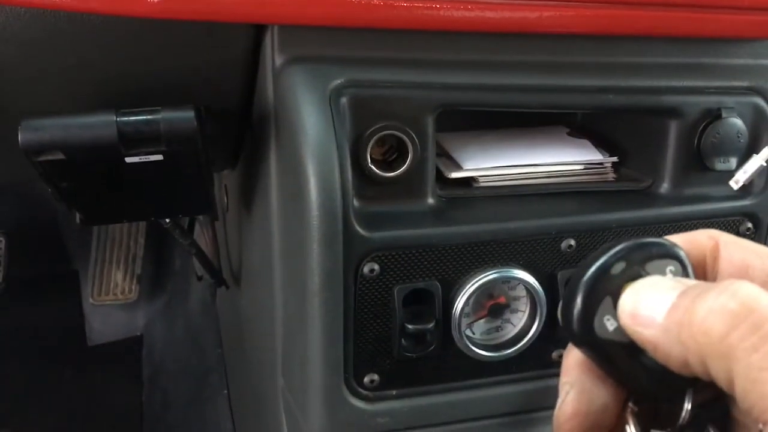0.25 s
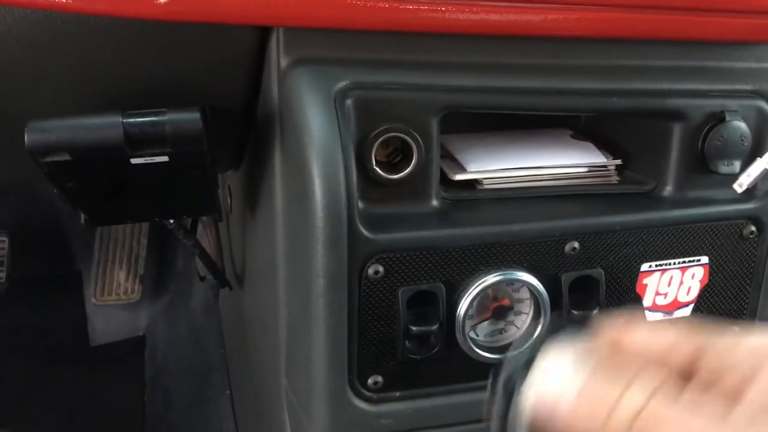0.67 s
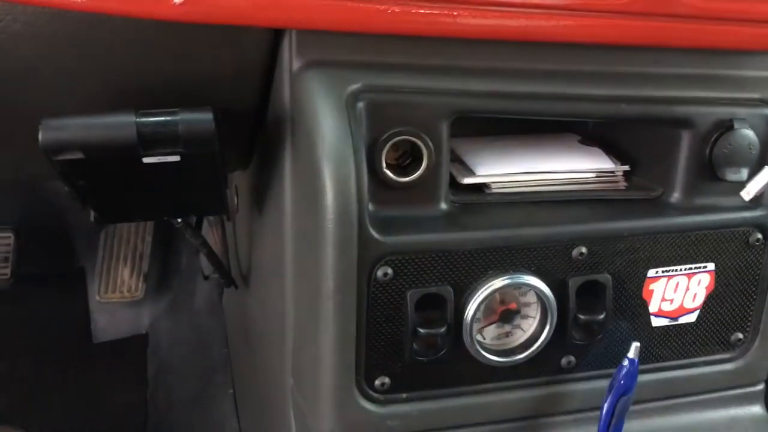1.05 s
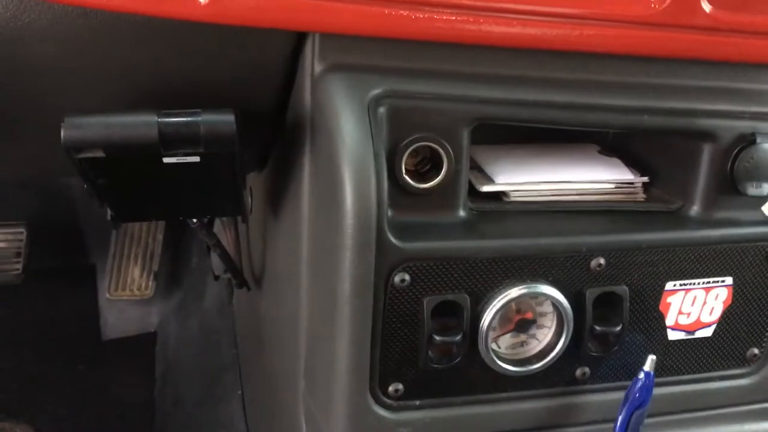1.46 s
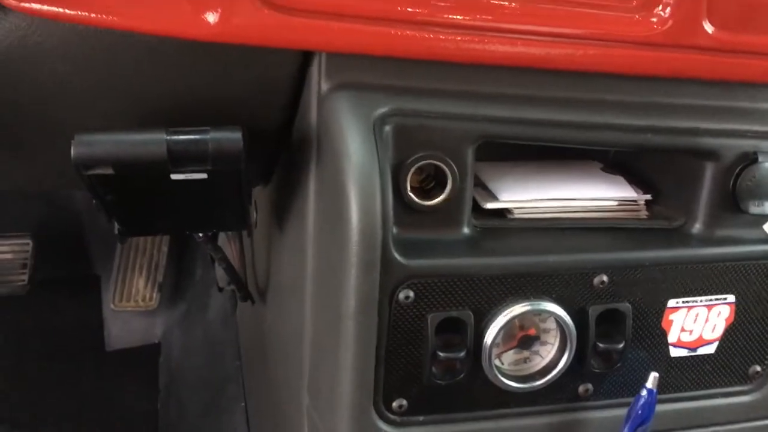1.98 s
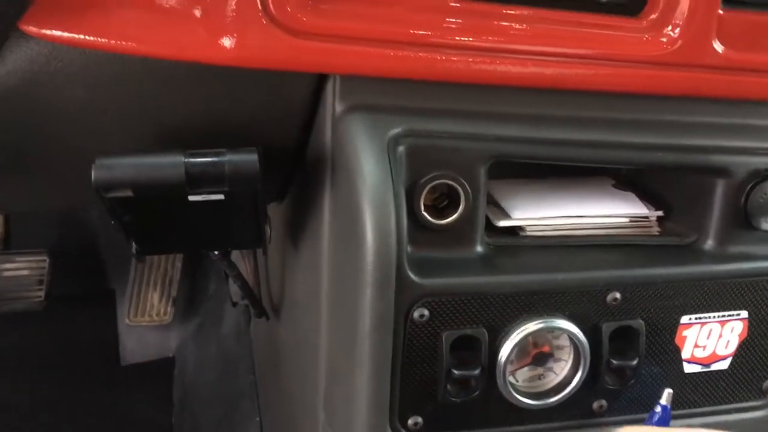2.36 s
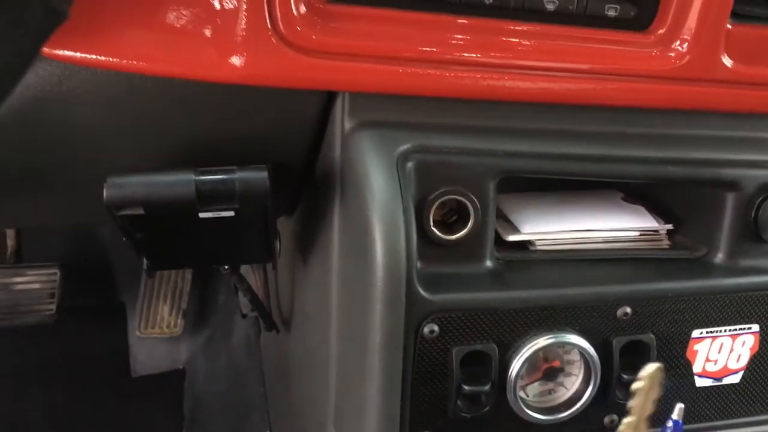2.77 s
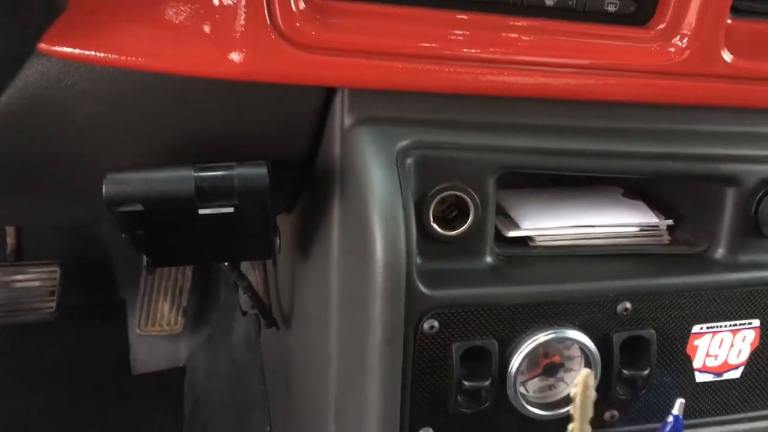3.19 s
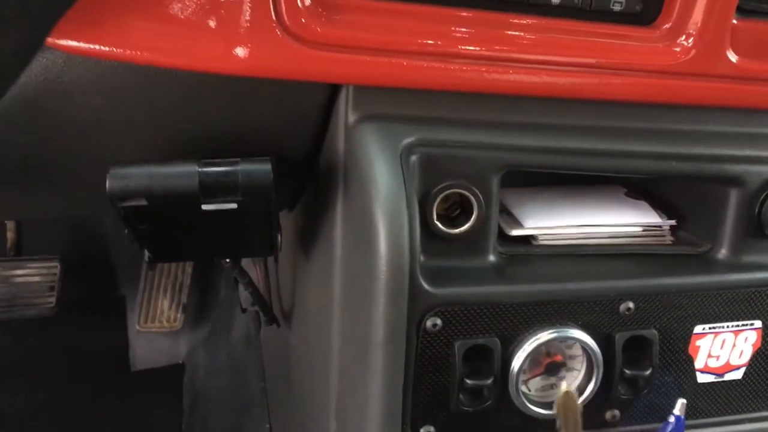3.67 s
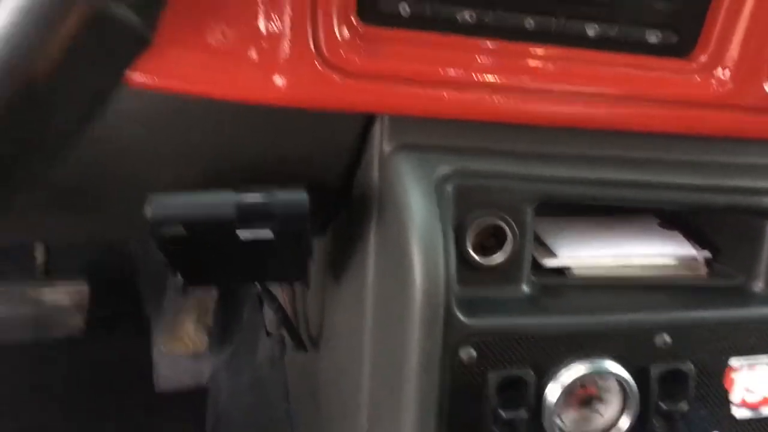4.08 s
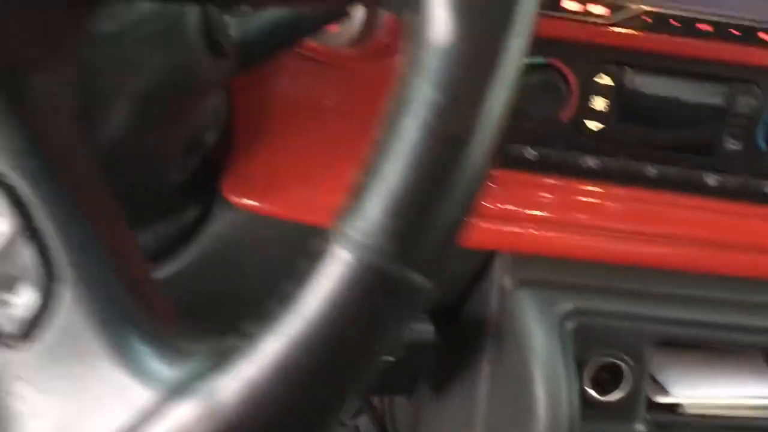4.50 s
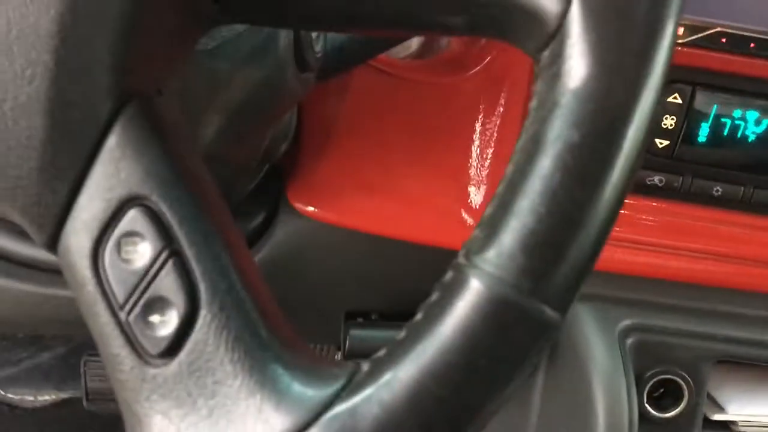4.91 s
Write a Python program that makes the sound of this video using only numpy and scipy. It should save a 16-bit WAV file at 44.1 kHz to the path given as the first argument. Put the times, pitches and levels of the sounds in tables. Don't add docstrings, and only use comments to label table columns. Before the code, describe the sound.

Keys and a plastic fob click and jingle in a quiet cab, a fuel pump hums, then a starter grinds and a diesel catches into a loud idle.

```python
import sys
import numpy as np
from scipy import signal
from scipy.fft import rfft, irfft, next_fast_len
from scipy.io import wavfile
from scipy.ndimage import uniform_filter1d

SR = 44100
rng = np.random.default_rng(int(sys.argv[2]) if len(sys.argv) > 2 else 0)


def log_audio(samples):
    frames = np.atleast_2d(samples).T
    limited = np.clip(frames, -1, 1)
    pcm = np.round(limited * 32767).astype(np.int16)
    wavfile.write(sys.argv[1], SR, pcm)


def volts_from_db(level):
    exponent = np.asarray(level, float) / 20
    return 10 ** exponent


N = 227011
T = np.arange(N) / SR
PUMP_ON_S = 2.15


def unit(x):
    return x / np.sqrt(np.mean(x ** 2) + 1e-20)


def curves(rows):
    s, *cols = np.transpose(rows)
    return [np.interp(T, s, c) for c in cols]


def between(start, end, fade):
    return np.clip(np.minimum(T - start, end - T) / fade, 0, 1)


def wobble(rate):
    knots = rng.standard_normal(int(N * rate / SR) + 4)
    return np.interp(T * rate, np.arange(len(knots)), knots)


def filtered(x, response):
    m = next_fast_len(len(x) + min(len(x), 8192))
    return irfft(rfft(x, m) * response(np.fft.rfftfreq(m, 1 / SR)), m)[:len(x)]


def noise(spectrum):
    f, db = np.transpose(spectrum)
    colour = lambda hz: volts_from_db(np.interp(np.log(hz + 1), np.log(f), db, -120, -120))
    return unit(filtered(rng.standard_normal(N), colour))


def resonances(modes):
    def response(f):
        return sum((-1) ** k * volts_from_db(db) * 1j * f * w / (c * c - f * f + 1j * f * w)
                   for k, (c, w, db) in enumerate(modes))
    return response


def add(track, s, sound):
    spot = track[round(s * SR):][:len(sound)]
    spot += sound[:len(spot)]


# order in eighths of the firing rate, level in dB.
ORDERS = [(9, -29), (10, -12), (20, -11), (34, -17), (35, -33), (44, -38)]
SPECIAL_ORDERS = {13: -19, 14: -20, 15: -20, 16: -8, 17: -18, 26: -5, 32: -12}


def firing_boom(turn):
    eighths = np.arange(9, 45)
    odd_and_high = (eighths % 2) * (eighths > 20) * (eighths < 35)
    plain_db = np.interp(eighths, *np.transpose(ORDERS)) - 5.5 * odd_and_high
    start = 2 * np.pi * rng.random(len(eighths)) * (eighths % 8 > 0)
    boom = np.zeros(N)
    for k, db, phase in zip(eighths, plain_db, start):
        order = volts_from_db(SPECIAL_ORDERS.get(k, db) + 2.5 * wobble(4)) * np.cos(k * turn / 8 + phase + .3 * wobble(5))
        if k == 26:
            order = order * (.5 + .5 * between(3.85, 5.22, 0.47))
        boom += order
    cycle = (turn - turn[round(4.33 * SR)]) / 8
    swing_level = volts_from_db(1 + 3.5 * np.cos(cycle) + 1.5 * wobble(9))
    boom = boom + swing_level * np.cos(15 * cycle + 2.3 * np.sin(cycle) + .4 * wobble(7))
    cab_top_hz = 199.5
    return unit(boom), lambda f: np.clip((cab_top_hz + 25 - f) / 40, .15, 1)


# time in seconds, firing rate in Hz, load in dB.
ENGINE_RUN = [
    (3.56, 56, -9),
    (3.6, 58.1, 0),
    (3.66, 51.76, 7.5),
    (3.73, 62.1, 7),
    (3.78, 59.1, -0.5),
    (3.85, 44.9, -7),
    (3.9, 43.25, 0),
    (4.3, 42.7, -1),
    (4.7, 44.2, 0.5),
    (5.15, 43.94, 1),
]
# frequency in Hz, level in dB per Hz.
PANEL_COLOUR = [(170, -29), (215, -4), (300, -6.5), (470, -18), (800, -30), (1100, -49)]
# frequency in Hz, level in dB per Hz.
CLATTER_COLOUR = [(410, -25), (700, -16), (1140, -3), (1920, -7), (3320, -15), (4860, -25.5), (7500, -30),
                  (16000, -42)]
# frequency in Hz, width in Hz, level in dB.
BLOCK_MODES = [(920, 55, -3), (1294, 70, 2.5), (1504, 72, -15)]
# time in seconds, level in dB.
CLATTER_SWELL = [(3.7, -1.5), (4.15, 0), (4.6, 2), (4.85, 0.5), (5.15, 1)]


def engine():
    hz, load_db = curves(ENGINE_RUN)
    turn = 2 * np.pi * np.cumsum(hz) / SR
    tone = volts_from_db(-24.5 + 1.8 * load_db + 3.5) * np.cos(turn)
    orders, cab_response = firing_boom(turn)
    boom = filtered(volts_from_db(-21 + 0.89 * load_db) * orders, cab_response)
    firing_size = volts_from_db(0.85 * rng.standard_normal(400))[(turn / (2 * np.pi)).astype(int)]
    pulse = firing_size * np.exp(np.cos(turn) - 1)
    panel = volts_from_db(-41 + 0.89 * load_db) * unit(noise(PANEL_COLOUR) * (1 + 0.58 * pulse))
    rattle = noise(CLATTER_COLOUR) * (1 + .6 * pulse) * volts_from_db(2.5 * wobble(300) + wobble(25))
    block = resonances(BLOCK_MODES)
    clatter = volts_from_db(-46 + 0.21 * load_db) * unit(filtered(rattle, lambda f: .6 + block(f)))
    clatter = clatter * between(3.7, 6, 0.11) * volts_from_db(curves(CLATTER_SWELL)[0])
    return (tone + boom + panel + clatter) * between(3.56, 6, 0.05)


# start in seconds, frequency in Hz, level in dB, length in seconds.
SINGS = [(3.045, 3170, -44, .04), (3.1, 3230, -44, .03), (3.3, 860, -44, .06), (3.39, 850, -44, .06),
         (3.12, 1930, -34, .04), (3.225, 1110, -41, .04), (3.12, 3180, -47, .04), (3.32, 3220, -49, .05),
         (3.19, 300, -38, .06), (3.39, 235, -35, .09), (2.96, 238, -34, .12), (3.09, 57, -30, .2),
         (3.585, 84, -17, .09), (3.64, 185, -25, .08), (3.6, 235, -41, .2), (3.59, 340, -43, .1),
         (3.71, 650, -47, .06)]
# start in seconds, from Hz, to Hz, level in dB, length in seconds.
GROWLS = [(2.985, 1445, 1387, -34, 0.058), (3.0, 1195, 1140, -39, 0.063), (3.05, 1340, 1040, -38, 0.1),
          (3.11, 1075, 950, -37, 0.069), (3.19, 1400, 1090, -39, 0.08), (3.295, 1436, 1388, -38.5, 0.081),
          (3.3, 1300, 1060, -41, 0.072), (3.395, 1550, 1370, -34, 0.055), (3.41, 1250, 1050, -44, 0.035),
          (3.495, 1565, 1400, -38, 0.058), (3.55, 1047, 1107, -49, .06)]


def gear_songs():
    out, t = np.zeros(N), T[:SR // 4]
    for s, hz, db, length in SINGS:
        swell = np.sin(np.pi * np.clip(t / length, 0, 1)) ** 0.63
        add(out, s, volts_from_db(db) * swell * np.sin(2 * np.pi * hz * t))
    for s, from_hz, to_hz, db, length in GROWLS:
        u = np.clip(t / length, 0, 1)
        glide = 2 * np.pi * np.cumsum(from_hz + (to_hz - from_hz) * u) / SR
        rough = np.cumsum(rng.standard_normal(len(t))) * 0.064
        add(out, s, volts_from_db(db) * np.sin(np.pi * u ** 0.53) * np.sin(glide + rough))
    return out * volts_from_db(3.2 * wobble(60))


# time in seconds, gear whine at top speed in Hz, at lowest speed in Hz,
# knock in dB, grind in dB.
STROKES = [
    (2.963, 3190, 3280, -12.5, -33),
    (3.043, 3214, 3113, -50, -42),
    (3.109, 3330, 3100, -31.5, -42),
    (3.198, 3520, 3100, -34, -41),
    (3.296, 3886, 3210, -27.5, -40.5),
    (3.396, 3900, 3170, -20, -39.5),
    (3.496, 4000, 4300, -25.5, -38),
    (3.563, 4670, 4650, -41, -39.5),
    (3.639, 4900, 4580, -23, -32),
    (3.716, 3600, 3250, -57, -49),
]
# frequency in Hz, width in Hz, level in dB.
HOUSING = [(854, 17, -2.5), (1110, 76, -1.5), (1402, 91, 2), (1904, 216, -1.5), (2640, 150, -13.5),
           (3140, 96, -8), (233.5, 15.2, 7), (300, 15, 0)]
# frequency in Hz, level in dB per Hz.
GRIND_COLOUR = [(250, 1.5), (400, 1), (800, -7), (1500, -7), (2500, -10), (4000, -21.5), (5000, -36)]
# frequency in Hz, level in dB per Hz.
BRUSH_COLOUR = [(3000, 5.5), (4500, 1), (9500, -6), (11000, -20), (16000, -19)]
# frequency in Hz, level in dB per Hz.
SHAKE_COLOUR = [(15, -38), (40, -2.5), (60, -1), (120, -9.5), (200, -24.5), (300, -27)]


def starter():
    s, top_hz, low_hz, knock_db, peak_db = np.transpose(STROKES)
    stroke = np.interp(T, s, np.arange(len(s)))
    since_peak = stroke - 0.34
    chug = np.cos(2 * np.pi * since_peak)

    halfway = s + 0.56 * np.append(np.diff(s), .07)
    bends_s = np.ravel([s - .014, s + .014, s + .6 * (halfway - s), halfway], "F")
    bends_hz = np.ravel([top_hz, top_hz, low_hz, low_hz], "F")
    hz = uniform_filter1d(np.interp(T, bends_s, bends_hz), size=500)
    mesh = 2 * np.pi * np.cumsum(hz * (1 + .03 * wobble(500))) / SR
    pairs = volts_from_db(3.5 * wobble(60)) * (np.sin(mesh) + .15 * np.sin(1.25 * mesh))
    whine = volts_from_db(-51.5) * pairs * between(0, 3.61, 0.027)

    stall_db = 2.5 * np.exp(-((stroke % 1 - .85) / 0.037) ** 2) * (T > s[2])
    grind_db = np.interp(since_peak, np.arange(len(s)), peak_db) + 6 * (chug - 1) / 2 - stall_db
    housing = resonances(HOUSING)
    teeth = rng.standard_normal(N) * volts_from_db(3 * wobble(250))
    grind = volts_from_db(-1.5) * unit(filtered(teeth, housing)) + volts_from_db(-3) * noise(GRIND_COLOUR)

    slam_db = 28 * np.exp(-abs(T - s[0]) / 0.052)
    hiss_db = -58.5 + 7 * (hz - 3300) / 1000 + 1.9 * chug + slam_db
    hiss = volts_from_db(hiss_db) * noise(BRUSH_COLOUR)

    blows, t = np.zeros(N), T[:SR // 4]
    for at, db in zip(s, knock_db):
        add(blows, at, volts_from_db(db - 60 * t / 0.12) * rng.standard_normal(len(t)))
    knocks = filtered(blows, lambda f: 2.5 * housing(f) + 0.23 / (1 + (f / 5000) ** 2))
    shake = volts_from_db(-33 - 1.5 * chug) * noise(SHAKE_COLOUR) * between(2.96, 3.62, 0.0099)
    gears = (volts_from_db(grind_db) * grind + hiss + whine) * between(2.935, 3.78, 0.029)
    return gears + knocks + shake + gear_songs()


# time in seconds, bright snap in dB, plastic tick in dB, tick frequency in Hz.
FOB_KNOCKS = [(0.016, -48.5, -51.5, 3750), (0.1818, -34, -45.5, 1230), (0.5745, -46, -35.5, 1520),
              (0.589, -37, -30.5, 3760), (0.622, -37.5, -45.5, 2210), (0.826, -16.5, -36, 2460),
              (.8285, -16, -38.5, 6840), (0.9109, -47, -45, 1860), (0.9196, -51, -40, 3450),
              (0.9476, -43, -43, 3630), (1.005, -36.5, -28, 2970), (1.0206, -35, -34.5, 2290),
              (1.049, -41, -41.5, 4480), (1.1262, -37, -41.5, 3630), (1.1793, -42, -53, 4870),
              (1.228, -29, -42, 5580), (1.249, -39.5, -44.5, 2530), (1.2582, -55, -43.5, 3250),
              (1.3563, -29.5, -47, 4670), (1.3664, -33, -38, 1600), (1.412, -39.5, -44, 3550),
              (1.4413, -37.5, -48, 2210), (1.5064, -24.5, -30, 2630), (1.5718, -34, -32.5, 3200),
              (1.6622, -42.5, -41, 2870), (1.7517, -26.5, -43.5, 2840), (1.8816, -21.5, -25.5, 2640),
              (1.9529, -21, -27.5, 2730), (1.9768, -45, -34, 2900), (2.2538, -46, -45.5, 1690),
              (2.9025, -44, -49, 2760),
              (0.184, -43, -44.5, 5450), (0.4452, -70, -57.5, 1400), (0.5701, -47, -51, 3500),
            (.6587, -64, -62, 3290), (0.6978, -60, -57.5, 2020), (0.7393, -60, -55.5, 3360),
            (.7785, -56, -61, 2260), (0.8052, -43, -55, 2180), (0.858, -36, -48, 2400),
            (.965, -62, -50, 3660), (0.993, -59, -62, 3510), (1.0096, -44, -32.5, 4000),
            (1.028, -40, -47, 3020), (1.0876, -55, -47, 3600), (1.094, -34, -56, 4200),
            (1.1114, -46, -48, 4130), (1.2, -52, -57, 3000), (1.334, -32, -57, 4500),
            (1.359, -21, -47, 2950), (1.37, -48, -46, 2700), (1.3986, -54, -51, 2190),
            (1.431, -39, -45, 2480), (1.7597, -33, -39.5, 2600), (1.766, -34, -44, 3500),
            (1.8134, -50, -46, 4420), (1.876, -50.5, -46, 2500), (1.889, -30.5, -34.5, 3300),
            (1.913, -35, -42, 5500), (2.205, -40, -55, 3000), (2.225, -46, -52, 6040),
            (2.753, -22, -40.5, 2500), (2.803, -31, -40, 2570), (2.806, -25, -48, 2980),
            (2.825, -34, -46, 2470), (2.834, -36, -44, 2260), (3.696, -34, -63, 5000),
            (3.953, -37, -62, 5030), (4.45, -51, -50, 3940), (4.761, -44, -42, 4470)]
# time in seconds, bright snap in dB.
JINGLE = [(0.4154, -46.5), (0.9343, -33), (1.105, -25), (1.163, -46), (1.241, -32), (1.307, -33),
          (1.318, -22.5), (1.327, -19.5), (1.34, -41), (1.623, -29), (1.841, -26), (1.856, -39),
          (1.934, -30), (1.944, -40), (1.994, -38), (2.022, -22), (2.041, -19.5), (2.0735, -24.5),
          (2.09, -35), (2.1863, -24), (2.433, -47), (2.477, -30.5), (2.5304, -37.5), (2.722, -31),
          (2.7343, -39), (2.75, -15.5), (2.7849, -38), (2.796, -23.5), (2.817, -30), (2.831, -25)]
# time in seconds, bright snap in dB.
TOUCHES = [(0.506, -48), (0.517, -45), (2.658, -51.5), (3.2165, -43.5), (3.3628, -45.5), (3.695, -39.5),
           (3.953, -38.5), (4.0154, -45), (4.213, -49), (4.2445, -41.5), (4.5594, -46.5), (4.7579, -29),
           (4.8005, -33), (4.949, -36.5), (4.974, -45.5), (5.054, -41), (5.071, -49)]


def contacts():
    grip_s = 2.1
    pairs = [(s, db, db - 23.5, 2700 if s < grip_s else 3830) for s, db in JINGLE]
    touches = [(s, db, db - 8, 5500) for s, db in TOUCHES]
    return FOB_KNOCKS + pairs + touches


def fob():
    out, t = np.zeros(N), T[:2700]
    crack, body, wash = volts_from_db(-1.5 - 60 * t / 0.0014), volts_from_db(-60 * t / 0.019), volts_from_db(-11 - 60 * t / 0.098)
    fade = crack + body + wash
    key_hz = sorted({hz for modes in KEY_MODES.values() for hz, _ in modes if hz > 6500})
    for s, snap_db, tick_db, hz in contacts():
        a, b = rng.standard_normal((2, len(t)))
        b[0] = 11.06
        woken = rng.standard_normal(len(key_hz))
        metal = resonances([(c, 260, 5 * g - 3) for c, g in zip(key_hz, woken)])
        snap = unit(filtered(a, lambda f: 0.64 * np.clip((f - 5500) / 4000, 0, 1) + metal(f)))
        side = hz * np.exp(.3 * rng.standard_normal(2))
        shell = resonances([(hz, 0.12 * hz, 1), (side[0], 200, -2), (1.4 * side[1], 300, -4),
                            (1.81 * hz, 1500, -9), (0.6 * hz, 700, -16)])
        tick = unit(filtered(b, shell))
        add(out, s, fade * (volts_from_db(snap_db - 4.5) * snap + volts_from_db(tick_db - 2) * tick))
    return out


KEY_MODES = {"long": [(6720, -12), (11670, 0), (15370, -6)], "short": [(6720, -12), (9790, -7), (10830, 0),
             (15370, -3)], "flat": [(4200, -18), (8350, 0), (10630, -9)], "small": [(11370, -5), (13590, 0),
             (15370, -3)], "tag": [(4200, -9), (9530, -5), (12190, 0)], "clip": [(6070, -12), (7800, 0)],
             "link": [(9530, 0)], "shell": [(2330, 0), (2950, -2)], "loop": [(4670, 0)],
             "hook": [(11370, 0), (14290, -5)], "ring": [(4250, 0)], "bead": [(6760, -14), (10830, 0),
             (11700, -5)], "eye": [(12250, -2), (14300, 0)]}
SWINGS = {"long": [(.624, -41, 0.0037), (1.84, -47, .02), (1.895, -36, 0.023), (1.914, -35, 0.029),
          (1.934, -27, 0.013), (1.953, -21, 0.0076), (1.8, -33, 0.023), (1.99, -38, 0.017),
          (2.022, -31, 0.014), (2.04, -34, .03), (2.189, -35.5, 0.012), (2.225, -52, .008), (2.8, -40, .01),
          (2.825, -37, 0.01)], "short": [(1.933, -27.5, .012), (1.957, -30.5, 0.013), (2.07, -44, .012)],
          "flat": [(1.094, -42, .004), (2.023, -43, 0.013), (2.189, -39, .02), (2.273, -57, .01),
          (2.737, -29, 0.0032), (2.75, -22.5, .005), (2.775, -42, .015), (2.823, -37.5, 0.023),
          (3.363, -47, 0.0052), (3.954, -52, 0.018)], "small": [(2.041, -30.5, 0.035), (2.752, -31, .014),
          (2.8, -32, .0067), (2.82, -29, 0.01)], "tag": [(2.479, -45, 0.015), (2.728, -40, .019),
          (2.787, -41.5, .018)], "clip": [(2.055, -44, .015), (2.085, -44.5, 0.037)],
          "link": [(.911, -50, .003), (.934, -46, .004), (1.105, -42, 0.0031), (1.162, -40.5, 0.0032),
          (1.18, -46, .006), (1.23, -44, .004), (1.254, -52, 0.012), (1.327, -31, .004), (2.7, -54, 0.031),
          (2.752, -32, 0.0077), (2.796, -32.5, 0.013), (4.252, -51.5, 0.0087)], "shell": [(1.842, -57, .02),
          (1.93, -52, .02), (2.0, -55, 0.011), (2.024, -47, 0.035)], "loop": [(3.923, -47, 0.024)],
          "hook": [(2.435, -55, .058), (2.722, -42, .016), (2.75, -25, .004)], "ring": [(2.722, -46, .012),
          (2.735, -50, .008), (2.751, -48, 0.0072), (2.785, -47, 0.0091), (2.82, -49, .008)],
          "bead": [(.835, -33, 0.0074), (2.025, -38, .006), (2.77, -49.5, .03)], "eye": [(2.477, -45, .008),
          (2.735, -32, .006), (2.786, -42, .006)]}


def keys():
    out, t = np.zeros(N), T[:SR // 5]
    for part, modes in KEY_MODES.items():
        for s, part_db, free in SWINGS[part]:
            for hz, mode_db in modes:
                touch, bend = [np.interp(t * 220, np.arange(45), v) for v in rng.standard_normal((2, 45))]
                damped = np.maximum(t - 2.1 * free - .006, 0)
                decay_db = 60 * t / (0.048 + 2.63 * free) + 60 * damped / 0.036
                level = volts_from_db(part_db + mode_db + 6 - decay_db + 5 * touch) * (1 - np.exp(-t / 0.0016))
                add(out, s - .001, level * np.sin(2 * np.pi * hz * t + 1.1 * bend))
    return out


# time in seconds, peak in dB, frequency in Hz, 60 dB decay in seconds.
BUMPS = [(.16, -40.5, 141, 0.15), (.463, -44.5, 107, 0.055), (1.124, -37, 161, 0.052),
         (1.452, -45, 300, 0.086), (1.753, -27.5, 203, 0.024), (1.768, -38.5, 385, 0.059),
         (1.776, -38.5, 620, 0.072), (1.823, -27.5, 167, 0.024), (1.882, -31.5, 1103, 0.038),
         (1.89, -38, 956, 0.021), (1.954, -32, 925, 0.015), (1.978, -37, 776, 0.013),
         (2.041, -42, 1170, 0.027), (2.075, -47, 645, 0.03), (2.151, -36.5, 112, 0.099),
         (2.503, -38.5, 320, 0.063), (2.703, -45.5, 300, 0.064)]
# frequency in Hz, level in dB per Hz.
RUB_COLOUR = [(300, 4), (1000, -6.5), (2200, -0.5), (4000, -6.5), (10000, -10), (16000, -16), (17000, -33)]
# time in seconds, rustle in dB.
MOTION = [
    (0, -83),
    (.65, -70.5),
    (.82, -56),
    (1.1, -55),
    (1.29, -60),
    (1.7, -59.5),
    (1.92, -45.5),
    (2.12, -57),
    (2.7, -63),
]


def hand():
    out, t = np.zeros(N), T[:SR // 5]
    for s, db, hz, t60 in BUMPS:
        wander = np.cumsum(rng.standard_normal(len(t))) * .004 * np.sqrt(hz)
        attack = 1 - np.exp(-t * hz / 0.32)
        add(out, s, volts_from_db(db + 4.5 - 60 * t / t60) * np.sin(2 * np.pi * hz * t + wander) * attack)
    grain = unit(noise(RUB_COLOUR) * volts_from_db(1.8 * wobble(90) + 2.77 * wobble(430)))
    tossing = between(2.72, 2.86, 0.012) + volts_from_db(-0.5) * between(1.84, 2.1, .03)
    bright = filtered(grain * volts_from_db(7.4 * wobble(120)), lambda hz: hz ** 2 / (hz ** 2 + 3360 ** 2))
    rustle = volts_from_db(curves(MOTION)[0]) * grain * between(-1, 2.95, 0.011)
    return out + volts_from_db(-46) * unit(bright) * tossing + rustle


# frequency in Hz, level in dB.
PUMP_LINES = [(211, -56), (424, -67.5), (710, -68.5), (1740, -71.5)]


def fuel_pump():
    hum = sum(volts_from_db(db - 2 + 3.3 * wobble(30)) * np.sin(2 * np.pi * hz * T) for hz, db in PUMP_LINES)
    return hum * between(PUMP_ON_S, 3.0, .02)


# frequency in Hz, level in dB per Hz.
RUMBLE_COLOUR = [(20, -31), (40, -4), (60, -2), (100, -4), (130, -9.5), (300, -21.5), (400, -25)]
# frequency in Hz, level in dB per Hz.
HUSH_COLOUR = [(150, -39), (220, -11), (600, -7.5), (1150, -5), (1500, -18.5), (16500, -35.5)]


def cab():
    kick_db = 9 * np.exp(-abs(T - PUMP_ON_S) / .15)
    primed_db = (3.5 + kick_db) * between(PUMP_ON_S, 2.68, 0.021)
    sway_db = 0.29 * np.maximum(curves(MOTION)[0] + 58, 0)
    rumble = volts_from_db(-55 + sway_db + primed_db + 3 * wobble(14)) * noise(RUMBLE_COLOUR)
    return rumble + volts_from_db(-65) * noise(HUSH_COLOUR)


def scene():
    return (engine() + starter() + fob() + keys() + hand() + fuel_pump() + cab())[None]


def low_pass(x):
    return signal.sosfilt(signal.butter(12, 16650, fs=SR, output="sos"), x)


def record(dry):
    band_limit = lambda hz: np.clip((16000 - hz) / 400, .03, 1) * (hz < 16600)
    mix = filtered(dry[0], band_limit)[None]
    return low_pass(mix)


dry = scene()
out = record(dry)
log_audio(out)
```